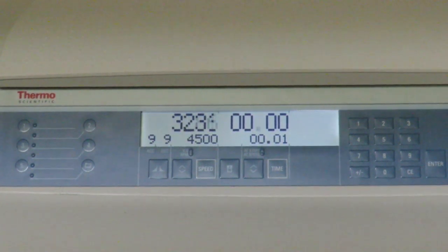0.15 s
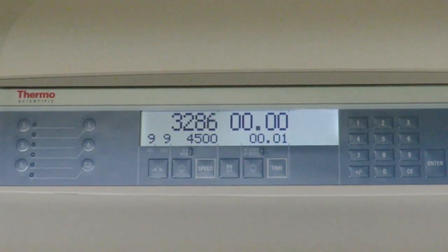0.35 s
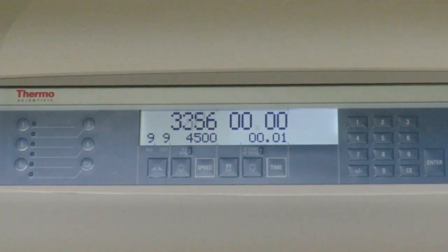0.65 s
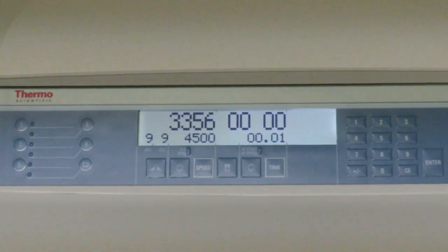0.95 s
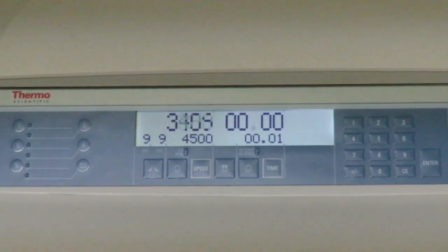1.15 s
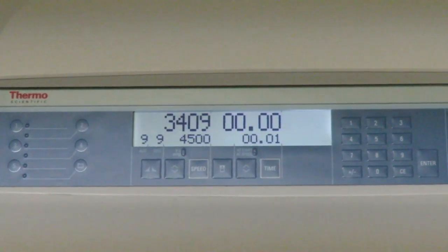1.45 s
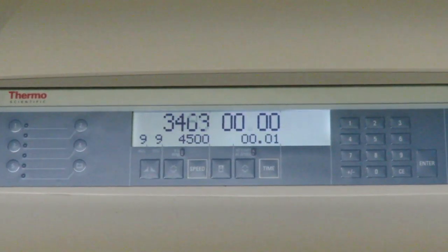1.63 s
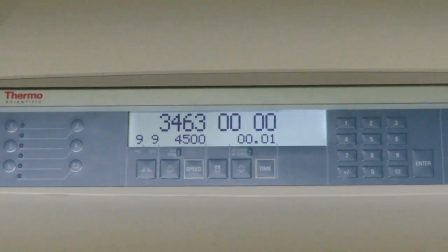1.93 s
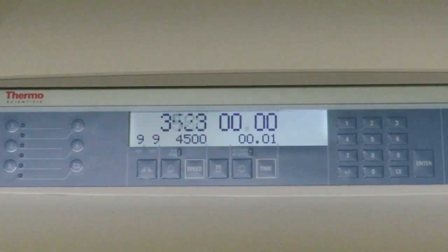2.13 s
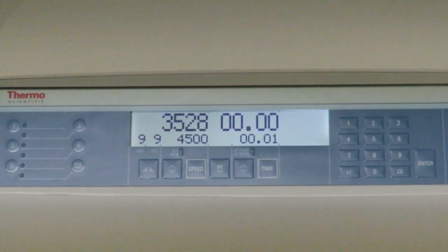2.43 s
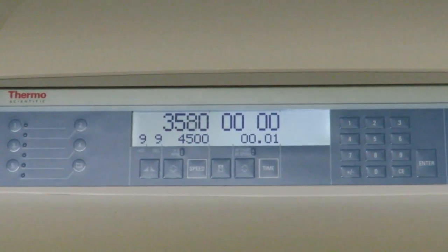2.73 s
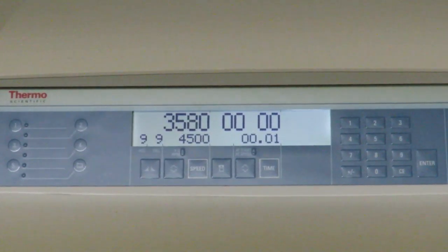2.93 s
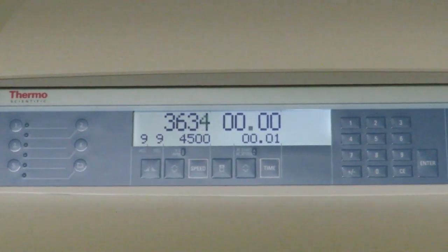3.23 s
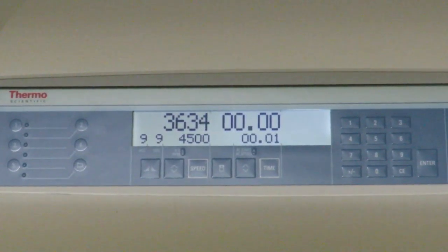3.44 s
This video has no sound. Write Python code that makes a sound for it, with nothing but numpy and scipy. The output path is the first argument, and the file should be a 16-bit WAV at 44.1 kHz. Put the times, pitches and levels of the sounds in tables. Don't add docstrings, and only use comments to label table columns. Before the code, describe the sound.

A lab centrifuge spinning up: deep rising hum, dipping then swelling, under continuous airy roar.

```python
import sys
import numpy as np
from scipy import signal
from scipy.fft import rfft, irfft
from scipy.io import wavfile
from scipy.ndimage import uniform_filter1d

SR = 44100
rng = np.random.default_rng(int(sys.argv[2]) if len(sys.argv) > 2 else 0)


def wav_record(signal):
    frames = np.transpose(np.atleast_2d(signal))
    bounded = np.clip(frames, -1, 1)
    quanta = np.round(bounded * 32767).astype(np.int16)
    wavfile.write(sys.argv[1], SR, quanta)


def nominal_scale(level):
    x = np.asarray(level, float) / 20
    return 10 ** x


N = 157878

# time in seconds, hum level in dB, its octave in dB,
# its third multiple in dB, left minus right in dB.
HUM_LEVELS = [(0, -15.5, -28.5, -46, .4), (.27, -14, -27.5, -46, .3), (.8, -15, -28.5, -48, .3),
              (1.05, -17, -26, -46, .3), (1.38, -18, -27.5, -41, 0), (1.52, -20.5, -29.5, -40, -.5),
              (1.6, -32, -30, -42, 0), (1.8, -33, -31.5, -37, 3), (1.95, -26, -31.5, -34.5, 3),
              (2.27, -23, -34, -42, 1.8), (2.5, -21.5, -34.5, -41, 1.3), (2.81, -15.7, -36, -40, .8),
              (3.0, -14.8, -36, -40, .5), (3.33, -11.4, -40, -42, .5), (3.58, -11.6, -40, -43, .6)]
# frequency in Hz, density in dB per Hz.
AIR_SPECTRUM = [(28, -23.5), (60, -19), (215, 3), (290, -2.5), (900, -4.5), (2900, -32), (4750, -39),
                (5200, -43.5)]
# frequency in Hz, gain in dB.
AIR_GROWTH = [(60, -3), (200, 3), (500, 2), (1200, 1), (1900, 4.5), (3500, 4), (8000, 0.5)]
# centre in Hz, width in Hz, level in dB.
PANEL_RESONANCES = [(118, 16, 10), (366, 67, 3.5), (512, 59, 5.5), (702, 37, 4), (875.6, 28, 6),
                    (912.4, 17.8, 10.5), (985, 28, 3.5), (1265, 97, 6), (1422, 72, 6), (1747, 80, 4.5),
                    (1957, 82, 5), (2222, 46, 7), (2605, 300, 6.5), (4800, 90, 2.5)]
# centre in Hz, width in Hz, level in dB.
PANEL_NULLS = [(85, 21, 2.5), (149, 40, -7), (494, 32, -11), (550, 23, -2), (778, 50, -9), (934, 7, -5.5),
               (1670, 23, 1.5), (2310, 48, -3.5), (2764, 140, -3.5), (6600, 700, -2)]
# frequency in Hz, side minus mid in dB.
AIR_WIDTH = [(60, -25), (150, -26), (330, -14.5), (600, -20.5), (1100, -16.5), (2600, -13.5), (5000, -11.5),
             (9000, -9)]
# multiple of the shaft speed, level in dB.
WHINE_ORDERS = [(86.1, -65), (85.2, -67), (84.2, -69), (81.7, -58), (82.6, -70), (78.3, -59)]
# frequency in Hz, density in dB per Hz.
HISS_SPECTRUM = [(5000, -6), (7300, 1), (9000, -9.5), (11300, -5.5), (12300, -14.5), (15000, -23.5)]
# centre in Hz, width in Hz, level in dB.
WHISTLE_RINGS = [(11480, 90, -4), (11580, 110, -2), (11950, 70, 2), (12130, 110, -2)]

START_HZ, GAIN_HZ_PER_S, SAG_HZ_PER_S2 = 54.6, 2.0, .025
ARMS = 4
HUM_SIDE_DB, HUM_FLUTTER_DB = -46, -0.12
AIR_DB, AIR_ROLL_DB = -21.5, 45
ROOM_T60_S, ROOM_DB, ROOM_FULL_HZ, ROOM_SAMPLES = .15, -10, 2500, 8192
UNBALANCE_DB, SLOT_ORDER, SLOT_DB = -43.5, 37, -54.5
SHELL_HZ, SHELL_WIDTH_HZ = 4794, 100
HISS_DB, HISS_SIDE_DB = -63, -5.5
WHISTLE_ORDER, WHISTLE_DB, WHISTLE_SPREAD_HZ = 202.7, -77.5, 300


def slope(table, hz):
    table_hz, table_db = np.array(table).T
    return np.interp(np.log(hz), np.log(table_hz), table_db)


def curve(table, hz):
    return slope(table, hz) + 30 * np.log10(np.minimum(hz / table[0][0], 1))


def ring(hz, centre_hz, width_hz):
    return 1 / (1 + (2 * (hz - centre_hz) / width_hz) ** 2)


def walk(rate_hz):
    hold = int(SR / rate_hz)
    steps = np.repeat(rng.standard_normal(N // hold + 1), hold)
    slewed = uniform_filter1d(uniform_filter1d(steps, hold), hold)
    return 1.3 * slewed[:N]


def unit(x, db):
    return x * nominal_scale(db) / np.std(x[0])


def tone(turns, order, db):
    return np.sqrt(2) * nominal_scale(db) * np.sin(2 * np.pi * (order * turns + rng.random()))


def hum(t, turns):
    times, *levels = np.array(HUM_LEVELS).T
    db, octave_db, third_db, pan_db = (np.interp(t, times, row) for row in levels)
    phase = 2 * np.pi * ARMS * turns + 2.4
    pan = nominal_scale(np.array([pan_db, -pan_db]) / 2)
    main = np.sqrt(2) * nominal_scale(db + HUM_FLUTTER_DB * walk(9.2)) * np.sin(phase) * pan
    wide = np.sqrt(2) * nominal_scale(HUM_SIDE_DB) * np.cos(phase) * np.array([[1], [-1]])
    octave = tone(turns, 2 * ARMS, octave_db) * np.array([[1], [.94]])
    return main + wide + octave + tone(turns, 3 * ARMS, third_db)


def room():
    decay = 1000. ** (-np.arange(ROOM_SAMPLES) / SR / ROOM_T60_S)
    tail = rng.standard_normal(ROOM_SAMPLES) * decay
    return rfft(tail / np.sqrt(np.sum(tail ** 2)), N)


def air(t, hz):
    db = curve(AIR_SPECTRUM, hz) - AIR_ROLL_DB * np.log10(np.maximum(hz / AIR_SPECTRUM[-1][0], 1))
    panels_db = 0
    for table in (PANEL_RESONANCES, PANEL_NULLS):
        for centre_hz, width_hz, level_db in table:
            panels_db = panels_db + level_db * ring(hz, centre_hz, width_hz)
    reflections = nominal_scale(ROOM_DB) * np.minimum(hz / ROOM_FULL_HZ, 1) * room()
    front = nominal_scale(panels_db) * (1 + reflections)
    sides = nominal_scale(slope(AIR_WIDTH, hz) + .3 * panels_db)
    spectrum = rfft(rng.standard_normal((2, N))) * nominal_scale(db) * np.array([front, sides])
    slow = irfft(spectrum, N)
    fast = irfft(spectrum * nominal_scale(slope(AIR_GROWTH, hz)), N)
    share = t / t[-1]
    return unit((1 - share) * slow + share * fast, AIR_DB)


def motor(shaft_hz, turns):
    throb = tone(turns, 1, UNBALANCE_DB + 1.0 * walk(4.9))
    out = throb + tone(turns, SLOT_ORDER, SLOT_DB + 1.5 * walk(4.2))
    for order, db in WHINE_ORDERS:
        shell = ring(order * shaft_hz, SHELL_HZ, SHELL_WIDTH_HZ) ** 2
        out = out + tone(turns, order, db + .8 * walk(10)) * shell
    return out


def hiss(hz):
    noise = irfft(rfft(rng.standard_normal((2, N))) * nominal_scale(curve(HISS_SPECTRUM, hz)), N)
    return unit(noise, HISS_DB) * nominal_scale(np.array([[0], [HISS_SIDE_DB]]))


def whistle(shaft_hz, hz):
    out = 0
    for centre_hz, width_hz, db in WHISTLE_RINGS:
        band = irfft(rfft(rng.standard_normal((1, N))) * ring(hz, centre_hz, width_hz), N)
        crossing = ring(WHISTLE_ORDER * shaft_hz, centre_hz, WHISTLE_SPREAD_HZ)
        out = out + unit(band, WHISTLE_DB + db) * crossing
    return out


def scene():
    t = np.arange(N) / SR
    hz = np.maximum(np.arange(N // 2 + 1) * SR / N, 1)
    shaft_hz = START_HZ + GAIN_HZ_PER_S * t - SAG_HZ_PER_S2 * t ** 2
    turns = np.cumsum(shaft_hz) / SR
    mid, side = air(t, hz) + hiss(hz)
    noise = np.array([mid + side, mid - side])
    return noise + hum(t, turns) + motor(shaft_hz, turns) + whistle(shaft_hz, hz)


def top_cut(x):
    return signal.sosfilt(signal.butter(12, 15150, fs=SR, output="sos"), x)


def record(dry):
    return top_cut(dry)


dry = scene()
out = record(dry)
wav_record(out)
```